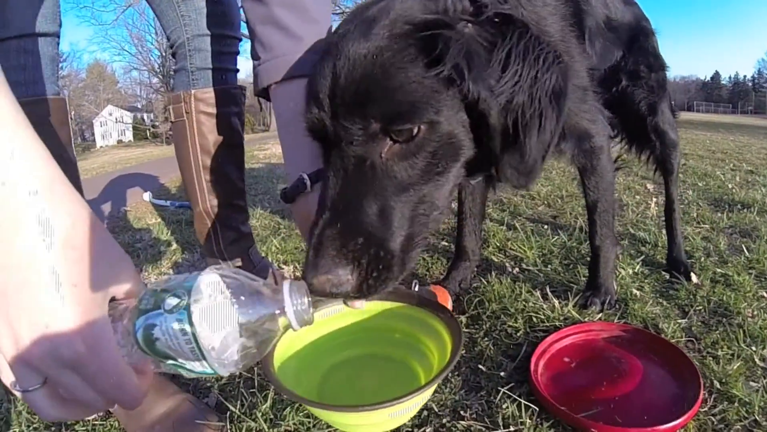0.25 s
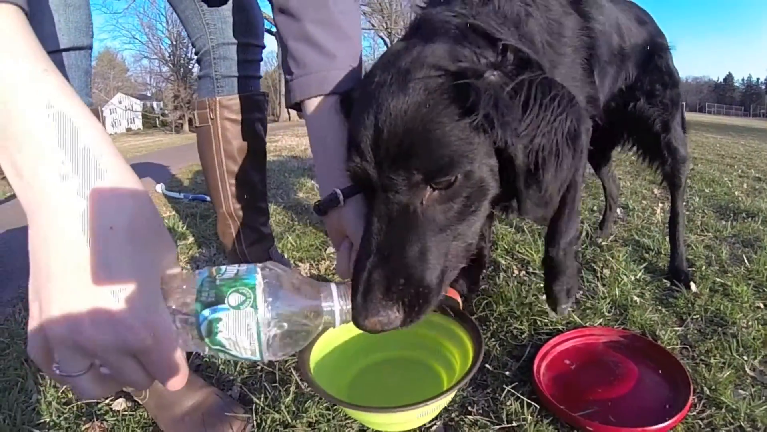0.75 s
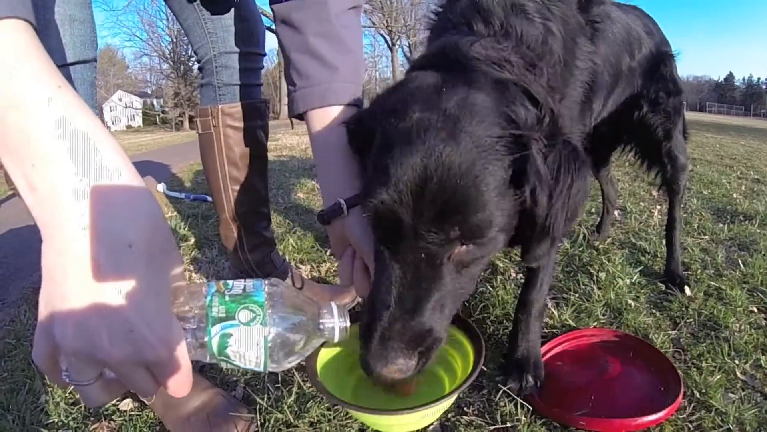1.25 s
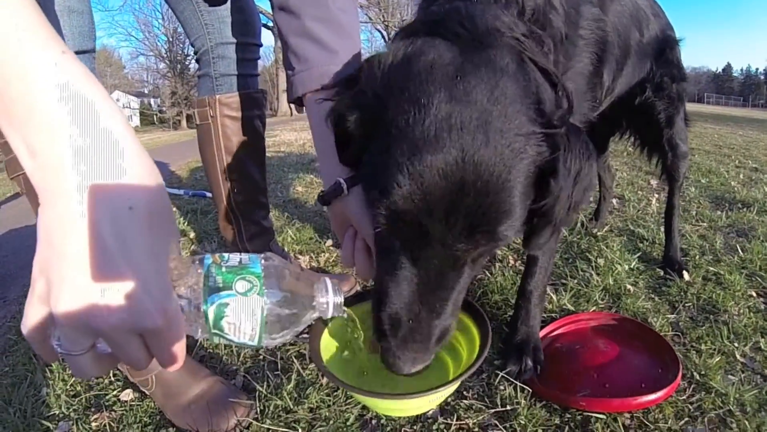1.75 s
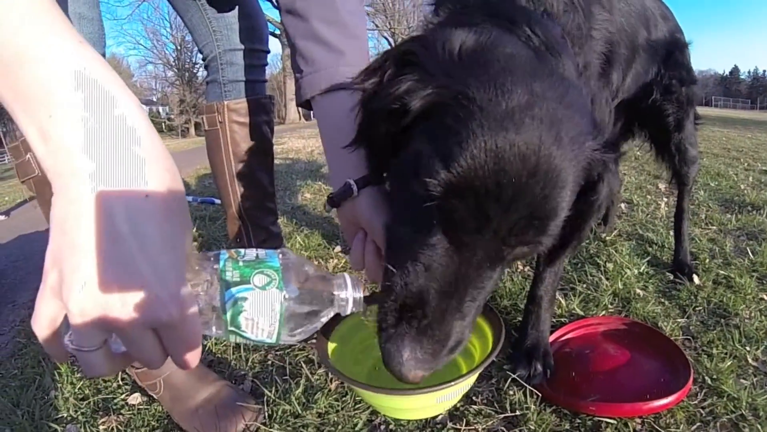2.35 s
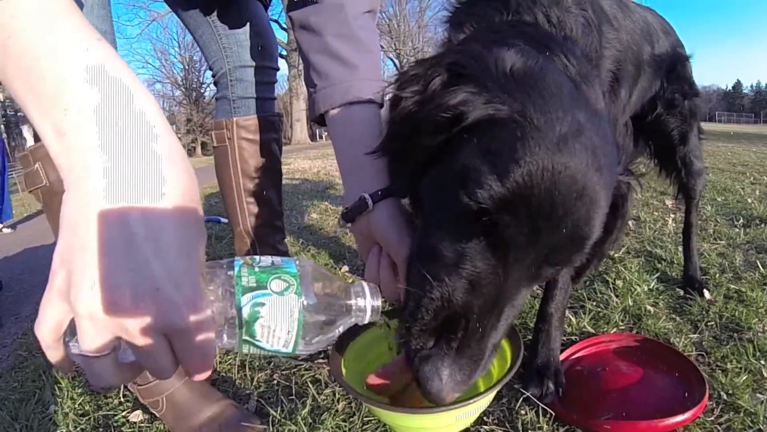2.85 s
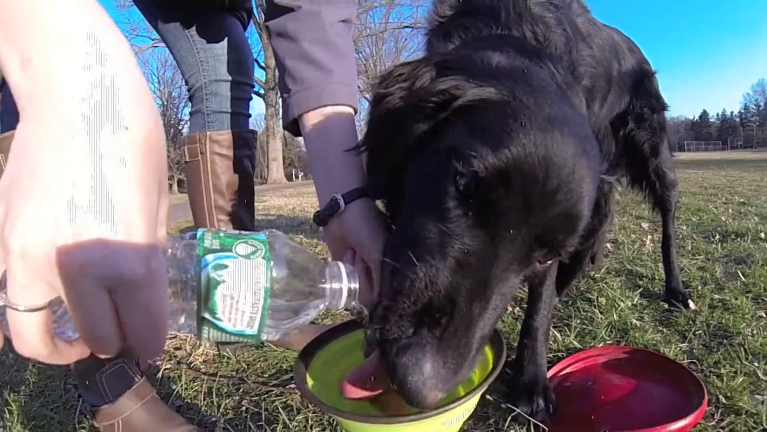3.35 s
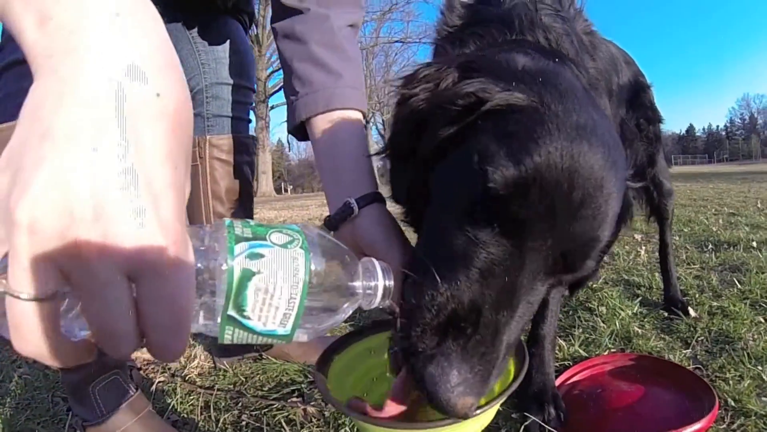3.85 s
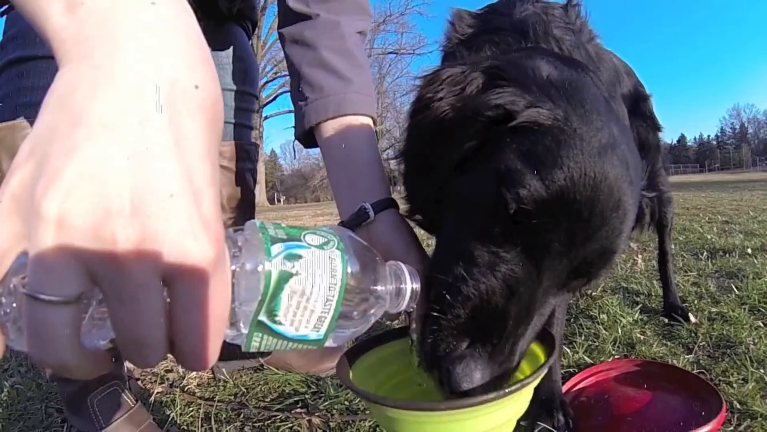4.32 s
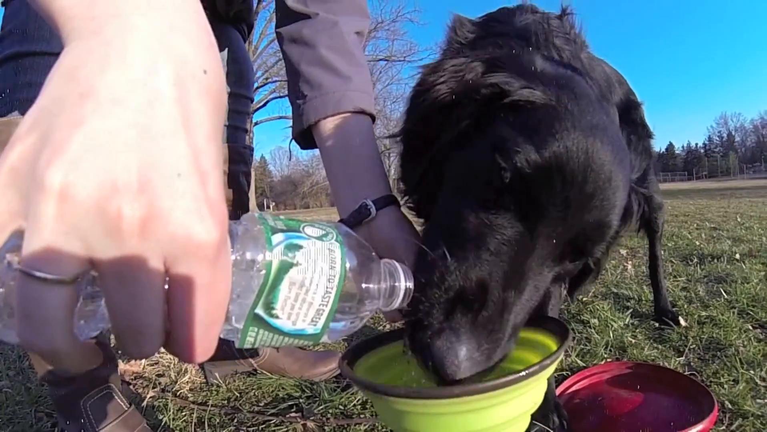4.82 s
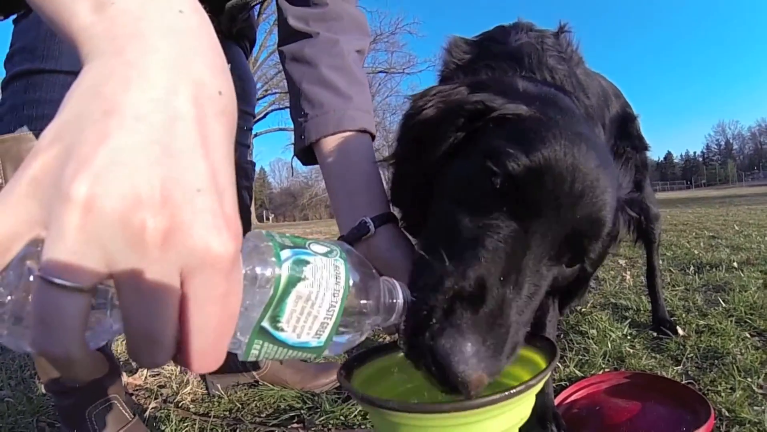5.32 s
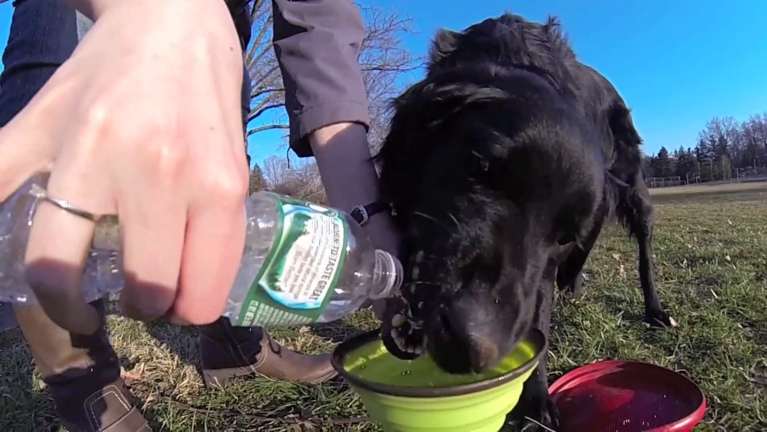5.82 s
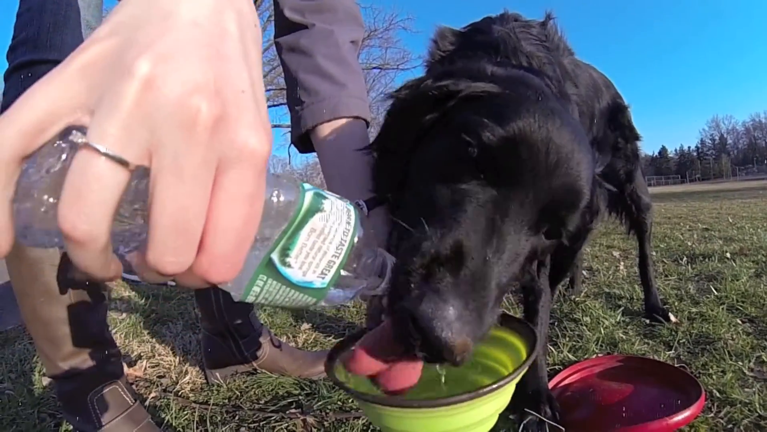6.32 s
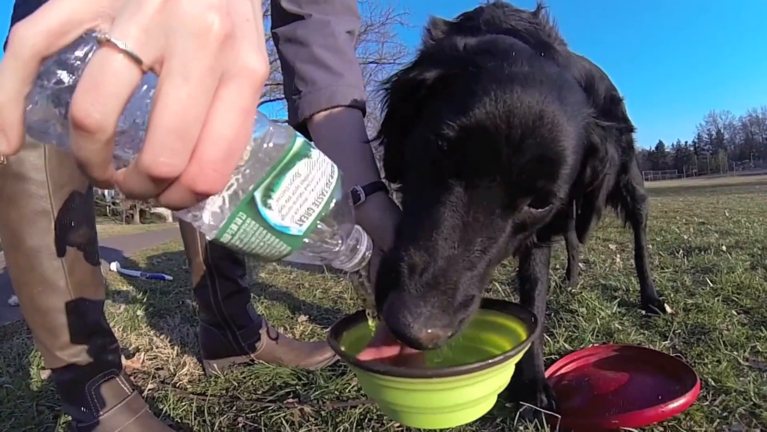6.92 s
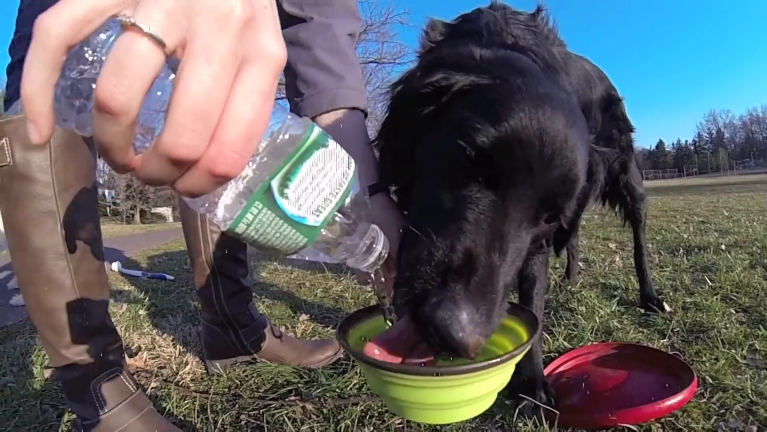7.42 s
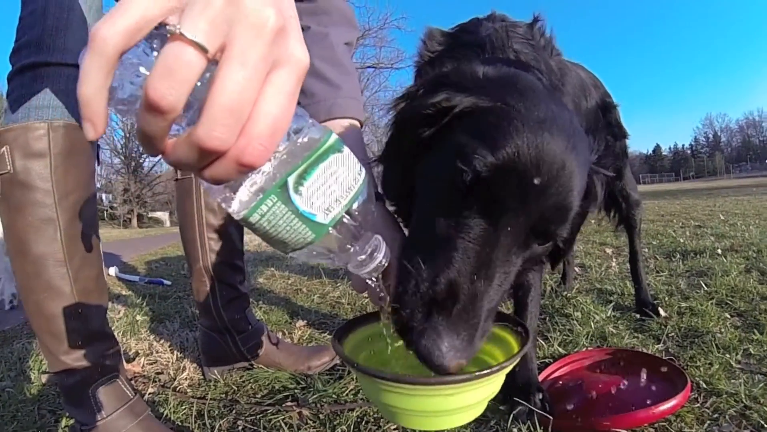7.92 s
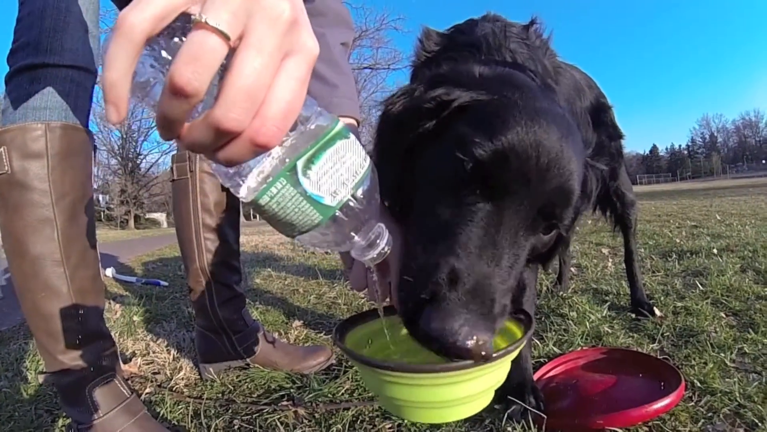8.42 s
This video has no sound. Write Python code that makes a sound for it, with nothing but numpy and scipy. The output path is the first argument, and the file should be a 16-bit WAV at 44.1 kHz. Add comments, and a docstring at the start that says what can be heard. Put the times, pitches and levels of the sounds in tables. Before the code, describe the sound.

Outdoors, wind buffets the microphone in low gusts while water trickles faintly from a bottle into a bowl. A dog puffs softly a few times and laps close by, its tongue making quick wet smacks, sloshes, low plops and tiny falling drops. About two thirds of the way through, the lapping is at its loudest and collar tags clink for a second. The drinking carries on to the end.

```python
"""A dog drinks from a soft bowl on a lawn. From the start, wind buffets the microphone over faint far air
and water trickles in from a bottle. From 0.2 s the dog puffs and laps: the tongue sloshes, smacks wetly,
throws spray that falls back as drops, and pops air pockets low in the bowl. From 2.4 s, faint hollow
notes come and go. From 6.2 to 7.3 s the head jerks and the collar tags clink, with the loudest laps;
the drinking goes on to the end at 8.7 s."""
import sys
import numpy as np
from scipy import signal
from scipy.io import wavfile

SR = 44100
rng = np.random.default_rng(int(sys.argv[2]) if len(sys.argv) > 2 else 0)


def bounce(signal):
    """Save signal as a 16-bit WAV file at the path given by the first command-line argument."""
    frames = np.transpose(np.atleast_2d(signal))
    limited = np.clip(frames, -1, 1)
    pcm = np.round(limited * 32767).astype(np.int16)
    wavfile.write(sys.argv[1], SR, pcm)


N = 382347


def amp(db):
    """Decibels to gain."""
    return 10 ** (np.asarray(db) / 20)


def unit_rms(x):
    """Scale to rms 1."""
    return x / np.sqrt(np.mean(x ** 2) + 1e-20)


def unit_peak(x):
    """Scale to peak 1."""
    return x / np.abs(x).max()


def butter(x, order, hz, kind):
    """Butterworth filter."""
    return signal.sosfilt(signal.butter(order, hz, kind, fs=SR, output="sos"), x)


def add(out, start_s, sound):
    """Mix a short sound in at start_s."""
    at = round(start_s * SR)
    out[at:at + len(sound)] += sound[:N - at]


def curves(rows):
    """Columns of a time table, interpolated to every sample."""
    times_s, *columns = np.transpose(rows)
    return [np.interp(np.arange(N) / SR, times_s, column) for column in columns]


def drift(rate_hz):
    """Slow random curve, rms about 1."""
    hop, settle = 40, 2000
    pole = np.exp(-2 * np.pi * hop * rate_hz / SR)
    white = rng.standard_normal(N // hop + settle + 2)
    slow = signal.lfilter([1], [1, -2 * pole, pole * pole], white)[settle:]
    return np.interp(np.arange(N) / hop, np.arange(len(slow)), unit_rms(slow))


def ring(drive, hz, t60_s):
    """Resonator: a unit click starts a decaying sine of height 1."""
    r, w = np.exp(-np.log(1000) / (t60_s * SR)), 2 * np.pi * hz / SR
    return signal.lfilter([0, np.sin(w)], [1, -2 * r * np.cos(w), r * r], drive + 1e-18)


def patchy_noise(spectrum, depth, rate_hz, per_octave=2):
    """Noise bands swelling partly together, partly alone; rms 1."""
    hz, db = np.transpose(spectrum)
    band_count = np.ceil(per_octave * np.log2(hz[-1] / hz[0]))
    edges_hz = hz[0] * 2 ** (np.arange(band_count + 1) / per_octave)
    edges_hz = edges_hz[edges_hz < SR / 4]
    out, together = 0, drift(rate_hz)
    white = rng.standard_normal((2, N + SR))
    for k, (low, high) in enumerate(zip(edges_hz, edges_hz[1:])):
        band = butter(white[k % 2], 2, [low, high], "band")[SR:]
        level_db = np.interp(np.log(low * high) / 2, np.log(hz), db)
        swell_db = depth * (3.46 * together + 2.16 * drift(rate_hz))
        out = out + amp(level_db + swell_db) * band
    return unit_rms(out)


# Wind strength: t/s, rumble level/dB, flutter level/dB
GUSTS = [(0, -30, -44.5), (0.12, -23, -47), (0.26, -25.5, -44.5), (0.45, -25, -34.5), (0.7, -26.5, -45),
         (1.1, -18.5, -35), (1.45, -26.5, -44.5), (1.7, -14.5, -35), (2.1, -25, -48.5), (2.77, -31, -48.5),
         (3.45, -27, -49.5), (3.85, -25.5, -56), (4.55, -24.5, -50.5), (4.73, -17.5, -26),
         (4.89, -28, -44.5), (5.01, -13.5, -34.5), (5.18, -22.5, -35), (5.36, -27.5, -42.5),
         (6.1, -34.5, -53), (6.55, -18, -38), (6.93, -26.5, -46.5), (7.06, -31.5, -49), (7.22, -22, -41.5),
         (7.8, -34.5, -48.5), (8.07, -20.5, -35.5), (8.2, -32, -48), (8.48, -23.5, -40.5),
         (8.67, -35, -43.5)]
# Eddy spectra: f/Hz, level/dB
RUMBLE_SPECTRUM = [(12, 6.5), (22, 1.5), (40, -3), (62, -8.5), (85, -17.5), (120, -51)]
FLUTTER_SPECTRUM = [(55, -34.5), (85, 2.5), (120, -6), (170, -16), (240, -26), (400, -46.5)]


def wind():
    """Eddies on the microphone: a rumble and a faster flutter that lurch together."""
    rumble_db, flutter_db = curves(GUSTS)
    buffet_db = 2.5 * drift(rate_hz=4.8)
    rumble = patchy_noise(RUMBLE_SPECTRUM, depth=1, rate_hz=4.4)
    flutter = patchy_noise(FLUTTER_SPECTRUM, depth=1, rate_hz=14)
    return amp(buffet_db) * (amp(rumble_db + 1) * rumble + amp(flutter_db + 3.5) * flutter)


# Far air spectrum: f/Hz, level/dB
AIR_SPECTRUM = [(88, -43.5), (150, -11), (201, -7.5), (463, -4.5), (980, -17), (1470, -40.5), (4190, -31),
                (6100, -33), (7420, -57), (9650, -95), (16300, -120)]


def far_air():
    """Faint, wavering noise of the open air."""
    return amp(-59.5) * patchy_noise(AIR_SPECTRUM, depth=0.8, rate_hz=4)


def bubble_cloud(spectrum, per_s, cycles, spread_db, pitch_count):
    """Random bubbles in clumps, each swelling fast and ringing at a pitch set by its size; rms 1."""
    hz, db = np.transpose(spectrum)
    strengths = amp(spread_db * np.minimum(rng.exponential(1, N), 4)) * rng.choice([-1, 1], N)
    born = rng.random(N) < per_s * amp(5 * drift(25)) / SR
    pitch_index = rng.integers(0, pitch_count, N)
    pitches_hz = np.geomspace(hz[0], hz[-1], pitch_count)
    gains = amp(np.interp(np.log(pitches_hz), np.log(hz), db))
    gains *= (pitches_hz / hz[0]) ** 2   # high rings are short, so they are raised to keep their level
    out = np.zeros(N)
    for k, (pitch_hz, gain) in enumerate(zip(pitches_hz, gains)):
        ringing = ring(strengths * born * (pitch_index == k), pitch_hz, cycles / pitch_hz)
        out += gain * ring(ringing, pitch_hz, 7 / pitch_hz)
    return unit_rms(out)


def swells(times_s, levels_db, rise_db_per_s, fall_db_per_s):
    """Gain that climbs to each peak and falls away."""
    t = np.arange(-SR // 5, SR // 3) / SR
    shape = amp(np.where(t < 0, rise_db_per_s * t, -fall_db_per_s * t))
    out = np.zeros(N)
    for peak_s, db in zip(times_s, levels_db):
        add(out, peak_s + t[0], amp(db) * shape)
    return out


# Bottle trickle: t/s, slosh level/dB, spray level/dB
TRICKLE = [(0, -58.5, -62), (1.5, -58.5, -64.5), (3, -60.5, -65), (4.5, -54.5, -61), (5.7, -71.5, -70.5),
           (6.6, -74.5, -64.5), (7.5, -59, -63), (8.67, -51, -65.5)]
# Tongue strokes at their deepest: t/s, slosh level/dB, spray level/dB
STROKES = [(0.249, -58, -62.5), (0.53, -57, -57), (0.65, -69, -58), (1.061, -44, -52.5), (1.481, -47, -78),
           (1.631, -50, -59), (1.802, -62, -56.5), (1.97, -49, -62), (2.109, -47.5, -66), (2.488, -39, -54),
           (2.985, -71, -52.5), (3.226, -41.5, -55.5), (3.473, -54.5, -54.5), (3.647, -41, -55),
           (3.761, -49.5, -58), (3.962, -68, -53), (4.195, -42.5, -54), (4.383, -54, -57),
           (4.681, -61, -51.5), (4.838, -47.5, -56), (5.019, -40, -49), (5.214, -42, -47),
           (5.408, -41, -55.5), (5.63, -41, -52.5), (5.899, -45.5, -45), (6.039, -42, -53),
           (6.182, -38.5, -50.5), (6.285, -55, -50.5), (6.396, -30.5, -43), (6.532, -36, -43),
           (6.614, -42, -46), (6.78, -61, -54), (6.9, -46.5, -46.5), (7.104, -50.5, -46), (7.259, -44, -50),
           (7.424, -40.5, -50), (7.633, -46.5, -42.5), (7.825, -39.5, -55.5), (8.043, -45, -50.5),
           (8.225, -68, -63), (8.306, -55, -48), (8.482, -51.5, -57.5), (8.641, -39.5, -46.5)]
# Water spectra: f/Hz, level/dB
SLOSH_SPECTRUM = [(180, -30.5), (260, -6.5), (330, -7), (420, 4), (520, -5.5), (680, -10.5), (900, -9.5),
                  (1300, -41.5)]
SPRAY_SPECTRUM = [(700, -2), (1000, 8), (1500, 10.5), (2200, 6), (3000, 0.5), (3500, -4), (4200, -1.5),
                  (4700, -11), (5300, -17.5), (7000, -15.5)]


def churn():
    """Trickle and tongue stir the bowl: large bubbles slosh, spray hisses with tiny ones."""
    trickle_slosh, trickle_spray = amp(curves(TRICKLE))
    times_s, slosh_db, spray_db = np.transpose(STROKES)
    tongue_slosh = swells(times_s, slosh_db, rise_db_per_s=159, fall_db_per_s=300.5)
    tongue_spray = swells(times_s, spray_db, rise_db_per_s=177.5, fall_db_per_s=258.5)
    gurgle = bubble_cloud(SLOSH_SPECTRUM, per_s=450, cycles=9, spread_db=2.5, pitch_count=14)
    wash = patchy_noise(SLOSH_SPECTRUM, depth=2, rate_hz=4.7)
    hiss = patchy_noise(SPRAY_SPECTRUM, depth=1.7, rate_hz=40, per_octave=4)
    stream = patchy_noise(SPRAY_SPECTRUM, depth=0.9, rate_hz=20, per_octave=4)
    fizz = bubble_cloud(SPRAY_SPECTRUM, per_s=900, cycles=18, spread_db=3.6, pitch_count=24)
    return ((trickle_slosh + tongue_slosh) * (gurgle + amp(-10) * wash)
            + trickle_spray * (stream + amp(-6.5) * fizz)
            + tongue_spray * (hiss + amp(-2) * fizz))


# Breaths between laps: t/s, length/s, level/dB
PUFFS = [(0.204, 0.088, -49.5), (0.482, 0.093, -55), (0.593, 0.038, -60), (0.994, 0.1, -52.5)]
# Muzzle resonances: f/Hz, width/Hz, level/dB
MUZZLE_MODES = [(535, 280, 0), (1420, 90, -2.5), (2500, 410, -6.5), (4100, 400, -17)]


def puffs():
    """Breath noise through the resonances of mouth and nose."""
    white = rng.standard_normal(N)
    breath, envelope = np.zeros((2, N))
    for hz, width_hz, db in MUZZLE_MODES:
        t60_s = np.log(1000) / (np.pi * width_hz)
        breath += amp(db) * unit_rms(ring(white, hz, t60_s))
    for start_s, length_s, db in PUFFS:
        add(envelope, start_s, amp(db) * signal.windows.tukey(round(length_s * SR), 0.6))
    return unit_rms(breath) * envelope


def bubble(hz, t60_s, rise, attack_s):
    """One ringing air pocket; its pitch climbs as it nears the surface."""
    t = np.arange(round(1.3 * t60_s * SR)) / SR
    envelope = (1 - np.exp(-t / attack_s)) * np.exp(-np.log(1000) * t / t60_s)
    return unit_peak(envelope) * np.sin(2 * np.pi * hz * (t + rise * t ** 2 / t60_s))


def froth(hz, t60_s, fade_s):
    """Dying crackle of tiny bursts around one pitch; peak 1."""
    t = np.arange(round(0.05 * SR)) / SR
    bursts = rng.standard_normal(len(t)) ** 3 * np.exp(-t / fade_s)
    return unit_peak(ring(ring(bursts, hz, t60_s), hz, t60_s))


# Wet smacks: t/s, level/dB, f/Hz, relative crack level/dB
SMACKS = [(0.302, -42, 2500, 4.5), (0.428, -48, 1490, 7), (0.471, -48.5, 3230, -10),
          (0.935, -38.5, 1420, -18), (1.119, -41.5, 2120, 0.5), (1.468, -42, 1540, -16),
          (1.517, -46, 1870, -15), (1.5364, -45, 1990, -16), (1.554, -46, 2200, -11),
          (1.619, -45, 1270, -6), (1.778, -37.5, 1290, -6.5), (1.802, -46, 1890, -8),
          (1.819, -33, 1635, -20), (1.8855, -34.5, 1610, -8.5), (1.994, -37.5, 1730, -10),
          (2.028, -47, 1900, -12), (2.104, -44, 1250, -17), (2.283, -45.5, 1760, 6), (2.343, -51, 2620, 15),
          (2.378, -41.5, 1560, 8.5), (2.454, -35, 1290, -16), (2.4846, -29, 1780, -24),
          (2.7626, -41.5, 1040, 3.5), (2.859, -41.5, 1740, -23), (2.9605, -45.5, 1250, 3),
          (3.3897, -35, 1670, -31), (3.458, -42, 1420, 9), (3.485, -39, 2280, -8), (3.552, -39, 2090, -10),
          (3.602, -40, 2400, -14), (3.661, -36.5, 1210, -20), (3.742, -38.5, 1800, -14),
          (3.7832, -38.5, 1210, 0), (3.802, -43, 2420, -1), (3.943, -37.5, 1560, 11.5),
          (4.008, -33.5, 1420, -2), (4.063, -37, 1710, -6), (4.1337, -39.5, 1530, -4),
          (4.183, -39, 2400, -15), (4.201, -34.5, 1290, -18), (4.371, -35, 996, -4.5),
          (4.481, -46, 2030, 2), (4.607, -46.5, 3000, -10), (4.688, -40, 2930, 2), (4.785, -38, 1720, -20),
          (4.803, -35.5, 2100, -17), (5.135, -28.5, 1970, -19), (5.171, -28.5, 2930, -18),
          (5.178, -32.5, 1660, -5), (5.187, -34, 1940, -1), (5.208, -32.5, 1080, 9),
          (5.815, -40.5, 3010, 0), (5.883, -44, 1420, -15), (5.9476, -37, 1560, 8),
          (6.0447, -36.5, 1720, -10), (6.0758, -41.5, 1740, -25), (6.321, -28, 1620, 11),
          (6.3859, -21.5, 1850, -5), (6.418, -27, 2460, -3), (6.4422, -27.5, 2270, -18),
          (6.466, -24, 1720, 7.5), (6.5179, -21.5, 1710, -3), (6.614, -27, 1640, -7),
          (6.8477, -24, 2230, -16), (6.889, -31, 1780, -1), (6.923, -38, 2500, -3), (6.981, -32.5, 830, 9),
          (7.013, -40, 2400, 6), (7.036, -38, 2360, 5), (7.1964, -49, 2250, 17.5), (7.2875, -39, 1080, -22),
          (7.519, -32, 2150, 7), (7.532, -37, 2900, -13), (7.584, -38.5, 2860, -12), (7.606, -34, 880, -15),
          (7.622, -30, 1920, -0.5), (7.699, -35, 1570, -28), (7.715, -38.5, 2450, -16),
          (7.781, -30, 1430, -18), (7.81, -29.5, 2350, -20), (7.835, -38, 1520, -7),
          (7.899, -43.5, 1550, 2), (7.99, -41, 2040, -2), (8.039, -36.5, 1440, 3), (8.172, -48, 1980, -3),
          (8.286, -40.5, 1610, 3), (8.3133, -31, 2170, -9), (8.349, -35.5, 1550, -2),
          (8.364, -35.5, 1420, -2), (8.455, -41, 1710, -17), (8.4826, -35.5, 1690, -9),
          (8.599, -34.5, 1840, -20), (8.63, -24.5, 2240, 3)]


def smacks():
    """A water film cracks, a bright bubble rings in froth, a smaller neighbour bursts."""
    t = np.arange(round(0.05 * SR)) / SR
    envelope = np.exp(-t / 0.0015) + 0.2 * np.exp(-t / 0.01)
    cracks = rng.standard_normal((len(SMACKS), len(t))) * envelope
    cracks[:, 0] = 10   # the film snaps
    cracks = butter(cracks, 2, 350, "high")
    cracks = butter(cracks, 4, 4000, "low")
    neighbours = rng.uniform([1.2, 0.001], [2, 0.008], (len(SMACKS), 2))
    out = np.zeros(N)
    for (at_s, db, hz, crack_db), crack, (ratio, delay_s) in zip(SMACKS, cracks, neighbours):
        add(out, at_s - 0.0005, amp(db + crack_db) * unit_peak(crack))
        add(out, at_s - 0.0005, amp(db) * bubble(hz, t60_s=27 / hz, rise=0.06, attack_s=0.00029))
        add(out, at_s, amp(db - 4.5) * froth(hz, t60_s=9 / hz, fade_s=0.0088))
        neighbour = bubble(min(ratio * hz, 4700), t60_s=20 / hz, rise=0.046, attack_s=0.0014)
        add(out, at_s + delay_s, amp(db - 14) * neighbour)
    return out


# Small drops: t/s, level/dB, f/Hz
DROPS = [(0.575, -43, 3920), (0.616, -41, 3990), (1.173, -44, 3260), (1.4576, -37, 4680),
         (1.665, -38, 3960), (1.789, -42, 4370), (1.843, -44, 4750), (1.896, -35.5, 3840),
         (2.1641, -34.5, 3880), (2.28, -36, 3700), (2.3442, -31.5, 4100), (2.371, -35, 3580),
         (2.407, -38, 3750), (3.553, -37.5, 3820), (3.597, -48, 3880), (3.652, -42, 4200),
         (3.843, -40, 3800), (3.941, -36, 4170), (4.015, -34.5, 4200), (4.058, -38.5, 4680),
         (4.356, -40, 3800), (4.5466, -38.5, 4300), (4.648, -37, 3950), (4.694, -30, 4060),
         (4.7922, -28, 4730), (5.1344, -24, 4290), (5.175, -31, 3450), (5.2066, -38, 3560),
         (5.226, -29, 4220), (5.7697, -31.5, 4130), (5.884, -36, 3660), (5.977, -31.5, 3870),
         (6.023, -34.5, 4540), (6.1764, -35.5, 3280), (6.32, -29, 3460), (6.3578, -28, 4640),
         (6.403, -26, 3950), (6.467, -32, 3300), (6.617, -24.5, 3740), (6.8476, -34, 3770),
         (6.866, -32, 3740), (6.8917, -26, 3750), (6.978, -39, 3240), (7.1417, -34, 3790),
         (7.5847, -39, 3700), (7.597, -37, 4050), (7.632, -28.5, 3700), (7.823, -37, 4430),
         (7.985, -41, 4400), (8.015, -35, 3370), (8.0393, -29.5, 3300), (8.114, -32.5, 4960),
         (8.356, -32, 3400), (8.389, -36, 4100), (8.639, -29, 3240)]


def drops():
    """Each drop falls back with a ping and a splat."""
    t = np.arange(round(0.05 * SR)) / SR
    out = np.zeros(N)
    for at_s, db, hz in DROPS:
        burst = rng.standard_normal(len(t)) * np.exp(-t / 0.01)
        splat = unit_peak(butter(burst, 3, [3000, 4900], "band"))
        ping = bubble(hz, t60_s=60 / hz, rise=0.016, attack_s=0.000072)
        add(out, at_s - 0.0003, amp(db - 9) * ping)
        add(out, at_s - 0.0003, amp(db - 15.5) * splat)
    return out


# Air pockets: t/s, level/dB, f/Hz, t60/s
PLOPS = [(0.638, -37.5, 410, 0.048), (0.819, -33.5, 279, 0.051), (0.935, -31.5, 517, 0.028),
         (1.468, -28.5, 540, 0.017), (1.537, -33, 495, 0.024), (2.0, -33, 474, 0.045),
         (2.38, -31.5, 407, 0.035), (2.459, -27.5, 479, 0.056), (2.764, -29.5, 387, 0.016),
         (3.109, -37.5, 300, 0.042), (3.242, -33.5, 453, 0.055), (3.546, -33, 450, 0.036),
         (3.58, -19, 420, 0.033), (3.652, -24, 372, 0.033), (4.135, -34.5, 432, 0.039),
         (4.366, -24, 411, 0.042), (4.434, -30, 360, 0.017), (4.86, -28, 453, 0.046),
         (4.944, -34, 383, 0.014), (5.188, -34, 483, 0.082), (5.406, -25, 466, 0.095),
         (5.616, -25.5, 441, 0.033), (5.946, -31.5, 684, 0.076), (6.007, -26.5, 246, 0.012),
         (6.045, -29, 438, 0.03), (6.139, -32, 385, 0.05), (6.216, -35.5, 664, 0.09),
         (6.324, -11.5, 287, 0.032), (6.387, -23, 262, 0.1), (6.472, -16, 242, 0.012),
         (6.522, -18.5, 265, 0.046), (6.587, -27.5, 377, 0.024), (6.983, -10.5, 398, 0.048),
         (7.151, -32.5, 312, 0.065), (7.272, -28.5, 426, 0.062), (7.356, -37, 415, 0.16),
         (7.437, -25, 425, 0.044), (7.835, -28, 448, 0.074), (8.318, -28, 404, 0.043)]


def plops():
    """Air pockets close under the tongue and ring low."""
    out = np.zeros(N)
    for at_s, db, hz, t60_s in PLOPS:
        add(out, at_s - 0.0015, amp(db) * bubble(hz, t60_s, rise=0.022, attack_s=0.00094))
    return out


# Hollow notes: t/s, length/s, f/Hz, level/dB
HOOTS = [(2.409, 0.041, 4930, -68), (3.616, 0.082, 1830, -53.5), (3.834, 0.035, 3880, -54.5),
         (3.88, 0.15, 715, -52), (4.254, 0.09, 730, -55), (4.603, 0.09, 624, -50.5),
         (5.764, 0.11, 1067, -50.5), (5.901, 0.071, 709, -47), (6.208, 0.074, 684, -50),
         (6.766, 0.041, 432, -42.5)]


def hoots():
    """Air swells and fades in a narrow resonance, perhaps the bottle neck."""
    out = np.zeros(N)
    for start_s, length_s, hz, db in HOOTS:
        air = ring(rng.standard_normal(SR // 4), hz, t60_s=0.055)[-round(length_s * SR):]
        add(out, start_s, amp(db) * unit_rms(air) * signal.windows.tukey(len(air), 0.6))
    return out


# Tag touches: t/s, ring level/dB, large tag level/dB, second tag level/dB
CLINKS = [(6.242, -51, -38, -45), (6.2618, -45, -42, -32.5), (6.318, -61, -38, -53),
          (6.3474, -49, -44, -58), (6.381, -43, -29, -27), (6.4, -54, -23, -45), (6.418, -39.5, -27, -28.5),
          (6.4453, -43, -39, -50), (6.521, -46, -37, -29), (6.567, -48, -44, -23.5),
          (6.5816, -46, -36, -31), (6.603, -55, -34, -36.5), (6.673, -49, -50, -38.5),
          (6.739, -58, -48, -30.5), (6.747, -32, -63, -40), (6.759, -71, -51, -25.5),
          (6.8466, -47, -20, -39), (6.887, -51, -52, -52), (6.9228, -42.5, -28.5, -30.5),
          (7.195, -57, -31, -52), (7.2172, -57, -34, -53), (7.2425, -53.5, -61, -61)]
# Metal modes: f/Hz, level/dB, t60/s
RING_MODES = [(5745, -7, .1), (5990, 0, .06), (6215, -8, .07), (6480, -16, .05)]
LARGE_TAG_MODES = [(2400, -3, .06), (2450, -8, .04), (4050, -17, .04)]
SECOND_TAG_MODES = [(2680, -6, .09), (2805, -12, .07), (3770, -16, .06)]


def collar_tags():
    """A small ring and two tags strike and rebound; their edges scrape on unevenly."""
    times_s, *blows_db = np.transpose(CLINKS)
    at = np.round(times_s * SR).astype(int)
    rebounds, slide_s = 8, 0.055
    gaps_s = rng.uniform(0.001, 0.009, (len(at), rebounds))
    lags = np.round(np.cumsum(gaps_s, axis=1) * SR).astype(int)
    ringing = np.zeros(N)
    for modes, blow_db in zip((RING_MODES, LARGE_TAG_MODES, SECOND_TAG_MODES), blows_db):
        scatter_db = rng.normal(0, 2.5, (len(at), len(modes)))
        for k, (hz, db, t60_s) in enumerate(modes):
            clicks = np.zeros(N)
            clicks[at] = amp(blow_db - 7 + db + scatter_db[:, k])
            rebound_db = rng.normal(-4.5, 3.9, lags.shape) - 1.7 * np.arange(rebounds)
            clicks[at[:, None] + lags] = clicks[at, None] * amp(rebound_db)
            ringing += ring(clicks, hz, t60_s)
    scrape = butter(rng.standard_normal(N), 2, [3000, 7300], "band")
    touches = np.zeros(N)
    touches[at] = amp(blows_db[0] - 11.5)
    sliding = signal.lfilter([1], [1, -np.exp(-1 / (slide_s * SR))], touches)
    return ringing + scrape * sliding * amp(4 * drift(60))


def mellow(water, corner_hz=4610, treble_db=-4.5):
    """Steep shelf that lowers the water's treble."""
    return butter(water, 6, corner_hz, "low") + amp(treble_db) * butter(water, 2, corner_hz, "high")


def scene():
    """All sources at one microphone in the open air."""
    air = far_air() + wind()
    water = mellow(churn() + smacks() + drops() + plops())
    return (air + water + collar_tags() + hoots() + puffs())[None]


def record(dry):
    """Soft clip, then a steep low-pass."""
    ceiling, stop_db, stop_hz = 0.8, 45, 8100
    rounded = ceiling * np.tanh(dry / ceiling)
    return signal.sosfilt(signal.cheby2(10, stop_db, stop_hz, fs=SR, output="sos"), rounded)


dry = scene()
out = record(dry)
bounce(out)
```